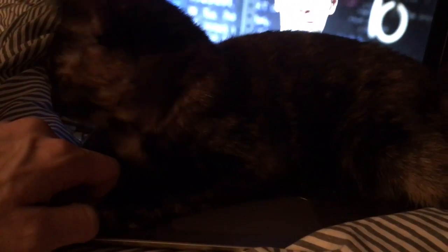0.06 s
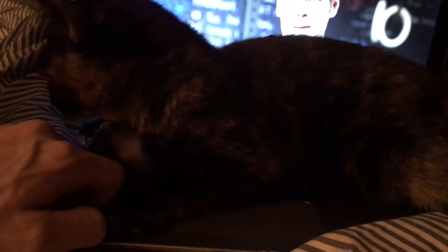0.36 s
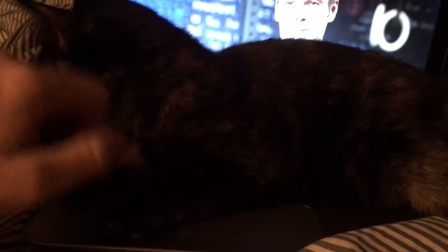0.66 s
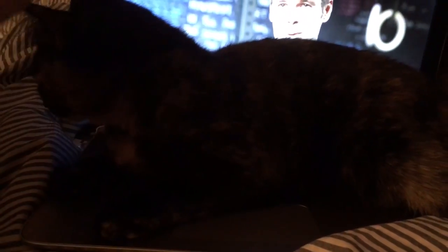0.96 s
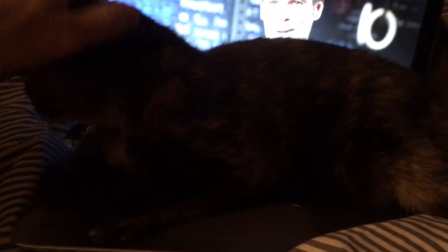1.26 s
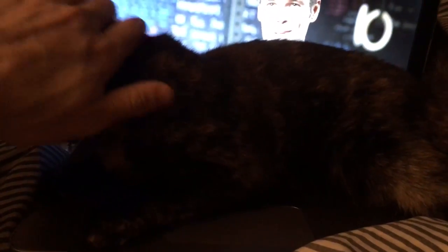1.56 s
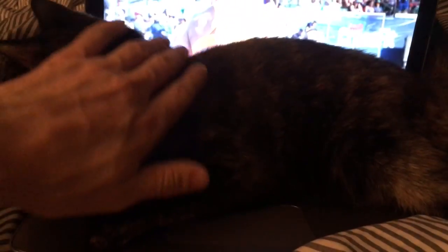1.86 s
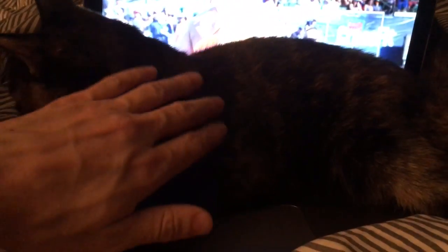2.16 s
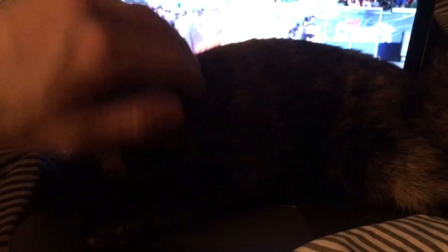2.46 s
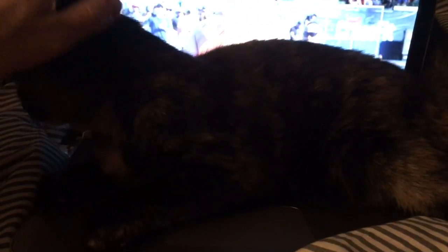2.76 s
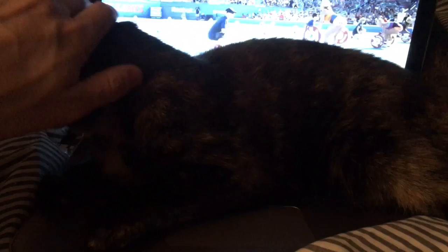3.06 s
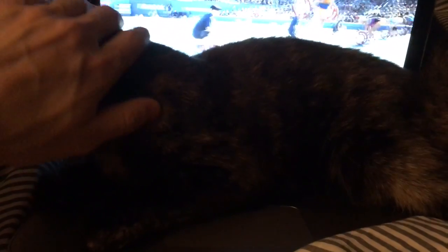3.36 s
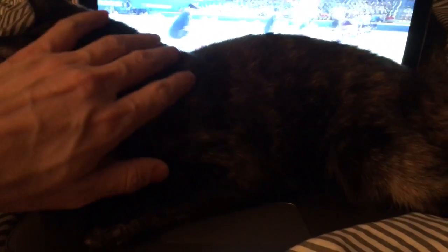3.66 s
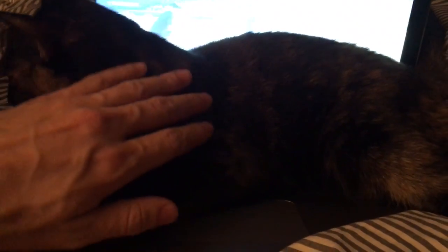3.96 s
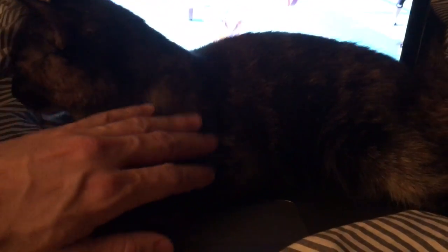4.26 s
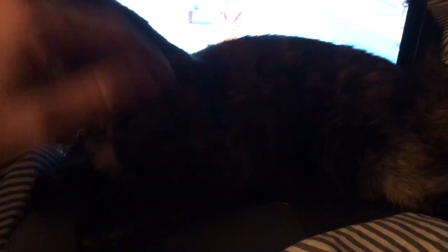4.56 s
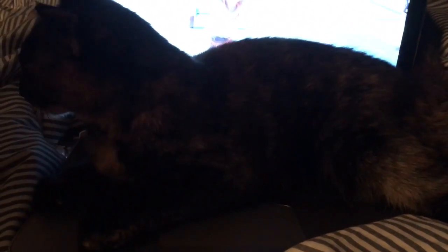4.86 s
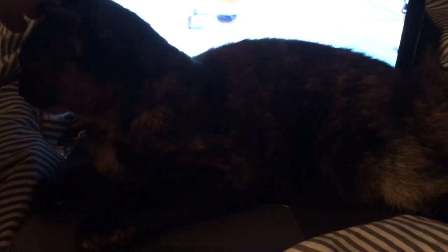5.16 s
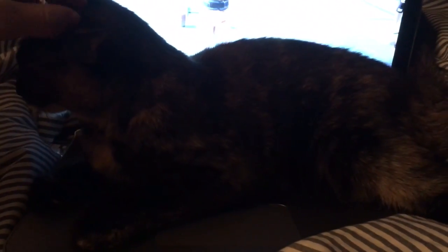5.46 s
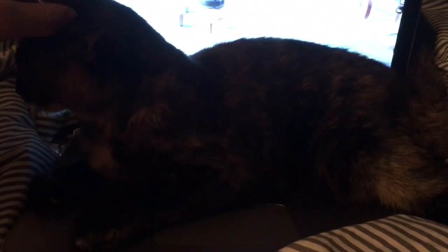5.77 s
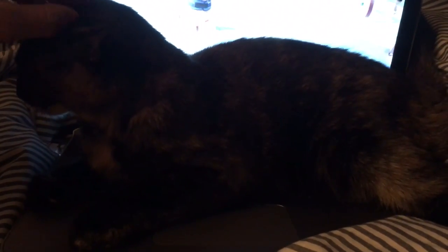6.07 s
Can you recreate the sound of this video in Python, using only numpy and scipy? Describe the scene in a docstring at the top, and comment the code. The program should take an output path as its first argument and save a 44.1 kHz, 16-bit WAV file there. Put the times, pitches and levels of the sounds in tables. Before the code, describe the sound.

In a quiet room, a cat's soft, pulsing purr comes and goes right by the microphone. The mattress gives a deep, soft bump, and a hand brushes faintly over fur, ending in tiny scratches. Meanwhile a muffled engine hum from outside grows and later drops in pitch, as a faint airy whistle briefly appears over low rumble, hiss and a thin electrical buzz.

```python
"""A cat purring on a bed

A cat purrs softly, close by: its voice box shuts and reopens, knocking its chest and ticking in its throat.
A hand strokes and scratches its fur and bumps the mattress; late on, a faint airy whistle comes and goes.
A low drone, like an engine outside, comes through the wall, sinks in pitch and climbs part of the way back.
Under it all lie room rumble, microphone hiss and a thin mains buzz."""
import sys
import numpy as np
from scipy import signal
from scipy.fft import rfft, irfft
from scipy.io import wavfile
from scipy.ndimage import uniform_filter1d

SR = 44100
rng = np.random.default_rng(int(sys.argv[2]) if len(sys.argv) > 2 else 0)


def unload_audio(sound):
    """Save the sound as a 16-bit wav file, at the path given as the first command line argument."""
    columns = np.transpose(np.atleast_2d(sound))
    # keep every value between -1 and 1, then stretch to whole-number steps
    steps = np.round(np.clip(columns, -1, 1) * 32767)
    wavfile.write(sys.argv[1], SR, steps.astype(np.int16))


N = 277814
TIME = np.arange(N) / SR
BIN_HZ = np.arange(N // 2 + 1) * SR / N  # the frequencies of a spectrum
PURR_HZ = 27.95  # beats a second


def undb(db):
    """Turn decibels into a factor to multiply by."""
    return 10 ** (np.asarray(db) / 20)


def unit(x):
    """Scale a sound to an average strength (rms) of 1."""
    return x / np.sqrt(np.mean(x ** 2))


def curve(rows, at=TIME):
    """Join (time, value) points with straight lines."""
    return np.interp(at, *np.transpose(rows))


def noise():
    """An even hiss: white noise."""
    return rng.standard_normal(N)


def wander(rate_hz):
    """A smooth random wobble with a spread near 1."""
    hold = max(int(SR / rate_hz), 2)
    steps = np.repeat(rng.standard_normal(N // hold + 1), hold)
    return unit(uniform_filter1d(uniform_filter1d(steps, hold), hold)[:N])


def swell(peak_s, rise_s, fall_s):
    """A bell-shaped curve that grows to 1 and falls away."""
    return np.exp(-.5 * ((TIME - peak_s) / np.where(TIME < peak_s, rise_s, fall_s)) ** 2)


def clicks(times, sizes):
    """Single sharp pushes at the given times."""
    out = np.zeros(N)
    np.add.at(out, np.clip((np.asarray(times) * SR).astype(int), 0, N - 1), sizes)
    return out


def resonate(x, hz, width_hz):
    """One resonance: its own pitch passes fully, others are weakened."""
    return signal.lfilter(*signal.iirpeak(hz, hz / width_hz, fs=SR), x)


def body(x, modes):
    """Ring several resonances side by side, scaled so that a push of 1 peaks at 1."""
    def ring(push):
        return sum(undb(db) * resonate(resonate(push, hz, 1.5 * width), hz, 1.5 * width)
                   for hz, width, db in modes)
    return ring(x) / np.abs(ring(signal.unit_impulse(2048))).max()


def colour(x, points):
    """Shape a sound's lows and highs along (Hz, dB) points, at strength 1."""
    hz, db = np.transpose(points)
    gain = undb(np.interp(np.log(np.maximum(BIN_HZ, 1)), np.log(hz), db))
    return unit(irfft(rfft(x) * gain, N))


def band(x, hz, width_hz):
    """Keep one band of frequencies, at strength 1."""
    return unit(irfft(rfft(x) / (1 + np.abs(2 * (BIN_HZ - hz) / width_hz) ** 3), N))


def purr(soft_db=10, snap_db=3, scatter_db=1.0, reopen_db=-5, reopen_share=.45, throat_db=-17,
         flutter_db=-2, lag_s=0.001404):
    """The voice box shuts and reopens about 28 times a second, knocking the chest, ticking the throat."""
    # strength of the purr: (time [s], relative level [dB])
    strength = [(0, -64), (0.14, -63.5), (0.3, -75), (0.45, -65), (0.75, -75), (1.2, -64.5), (1.62, -75),
                (1.88, -65.5), (2.65, -66), (3.72, -71.5), (4.08, -64), (4.45, -67), (5.0, -78), (5.2, -66),
                (5.67, -81), (6.02, -71), (6.3, -81)]
    # resonances of the chest and of the throat: (pitch [Hz], width [Hz], relative level [dB])
    chest = [(180, 91, 5.5), (251, 120, 5), (371, 109, 2.5)]
    throat = [(1110, 230, 5.5), (1600, 240, -12), (2320, 106, -6.5)]
    snap_s, peak_db, bright_db = np.transpose(snaps())  # includes the hand's two crackles
    # evenly spaced soft beats fill the gaps between the snaps
    edges = np.r_[0, snap_s, N / SR]
    beats = np.concatenate([np.linspace(start, end, max(round((end - start) * PURR_HZ), 1) + 1)[1:-1]
                            for start, end in zip(edges, edges[1:])])
    shut_late, shut_loud, reopen_late, reopen_loud = rng.standard_normal((len(beats), 4)).T
    shut_s = beats + 0.00199 * shut_late
    reopen_s = shut_s + reopen_share / PURR_HZ + 0.00297 * reopen_late
    size = undb(curve(strength, shut_s) + soft_db)
    soft = clicks(shut_s, size * undb(scatter_db * shut_loud))
    soft += clicks(reopen_s, size * undb(reopen_db + scatter_db * reopen_loud))
    knocks = soft + clicks(snap_s + lag_s, undb(peak_db + snap_db))
    ticks = soft * undb(throat_db) + clicks(snap_s + lag_s, undb(peak_db + bright_db))
    # soft tissue keeps fluttering between the beats
    flutter = unit(body(noise(), chest)) * undb(curve(strength) + flutter_db)
    sound = body(knocks, chest) + body(ticks, throat) + flutter
    # the nose passage swallows part of a band between chest and throat
    return sound - 0.39 * resonate(sound, hz=623, width_hz=590)


def snaps(fade_db=1.0, dull_db=1.2):
    """List the sharp snaps: loud purr beats, plus two bright crackles from the stroking hand."""
    # runs of snaps, each snap weaker and duller than the last; the hand's are at 2.246 and 2.269 s:
    # (start [s], snaps [count], spacing [beats], relative level [dB], brightness [dB])
    runs = [(0.057, 2, 2, -51, -26), (0.388, 1, 1, -51, -20), (0.485, 2, 1, -48, -8),
            (0.563, 1, 1, -47, -9), (0.947, 1, 1, -51, -3.5), (1.021, 1, 1, -48, -5.5),
            (1.085, 1, 1, -48.5, -9), (1.118, 4, 2, -45, -6.5), (1.839, 1, 1, -45, -9),
            (2.064, 1, 1, -49.5, -5), (2.246, 1, 1, -55, 3), (2.269, 1, 1, -51, -1.5),
            (2.498, 1, 1, -50, -7), (2.679, 3, 2, -46, -13), (3.052, 1, 1, -52.5, -5),
            (3.52, 1, 1, -49.5, -1.5), (3.842, 1, 1, -45, -20), (4.015, 3, 1, -47, -7),
            (4.351, 1, 1, -56, -0.5), (4.913, 1, 1, -47, -6.5), (5.823, 1, 1, -49, -8),
            (6.039, 1, 1, -50, -5), (6.185, 1, 1, -50, -2.5)]
    return [(start + k * round(spacing) / PURR_HZ, db - k * fade_db, bright - k * dull_db)
            for start, count, spacing, db, bright in runs for k in range(round(count))]


def drone(waver=0.0047, flicker_db=1.0, partials=5):
    """Only an engine's lowest partials (multiples of its firing rate) pass the wall into the room."""
    # speed of the engine: (time [s], firing rate [Hz])
    speed = [(0, 61.75), (0.3, 62.75), (3.3, 62.96), (3.78, 62.17), (4.03, 55.06), (4.2, 51.63),
             (4.68, 51.03), (4.95, 53.44), (5.3, 53.66), (5.8, 53.86), (6.05, 57.1), (6.3, 58.94)]
    # strength of the drone before the room shapes it: (time [s], level [dB])
    strength = [(0, -56.5), (1.22, -56.5), (1.3, -47.5), (1.85, -47.5), (2.7, -40), (3.3, -38.5),
                (4.08, -40.5), (5.45, -39.5), (5.78, -47), (6.05, -35.5), (6.3, -43)]
    # brief swells and dips of one partial: (time [s], half length [s], partial [number], change [dB])
    changes = [(3.4, 0.026, 2, -7), (3.724, 0.22, 1, 8), (3.847, 0.033, 2, -6), (3.86, 0.083, 3, -3.5),
               (4.085, 0.03, 2, 3.5), (4.175, 0.018, 2, -14), (4.717, 0.036, 2, -9.5),
               (5.055, 0.053, 2, -12), (5.12, 0.18, 3, -5), (5.917, 0.042, 2, -16)]
    hz, level_db = curve(speed), curve(strength)
    phase = 2 * np.pi * np.cumsum(hz * (1 + waver * wander(20))) / SR
    out = np.zeros(N)
    for k in range(1, partials + 1):
        change_db = sum(db * swell(s, half, half) for s, half, number, db in changes if round(number) == k)
        gain = undb(level_db + change_db + flicker_db * wander(25)) * room_gain(k * hz)
        out += gain * np.sin(k * phase + rng.uniform(0, 2 * np.pi))
    return np.sqrt(2) * out


def room_gain(hz):
    """The room carries a tone more strongly when it is near one of the room's resonances."""
    # resonances of the room: (pitch [Hz], width [Hz], gain [dB])
    modes = [(59, 6.2, -20.5), (107.9, 7.85, -1.5), (123.97, 11.7, -5), (150.4, 10.7, -6),
             (176.3, 12.85, -15.5), (192.4, 14, -20), (250, 20, -31.5)]
    return sum(undb(db) / (1 + (2 * (hz - centre) / width) ** 2) for centre, width, db in modes)


def rumble_and_hiss(rumble_db=-55.5, hiss_db=-73, sway_db=0.16, creep_db=1, creep_s=0.8):
    """The room rumbles and the microphone hisses; both start a little quiet and creep up."""
    # tone colour of the rumble and of the hiss: (frequency [Hz], relative level [dB])
    rumble_shape = [(20, -20.5), (35, -2.5), (55, -4), (85, 2.5), (130, 2.5), (190, -5), (260, -9),
                    (400, -18), (650, -28), (780, -25.5), (860, -20), (1100, -24), (1500, -33.5),
                    (3000, -47)]
    hiss_shape = [(500, -11), (1500, 9), (2450, 6.5), (2800, 1), (3200, 3.5), (4400, 0.5), (4950, -2.5),
                  (6100, 2), (7600, -3.5), (9800, 0), (10450, -6), (11200, -2), (13500, -3.5), (17000, -7)]
    rumble = colour(noise(), rumble_shape) * undb(rumble_db + sway_db * wander(5))
    hiss = colour(noise(), hiss_shape) * undb(hiss_db)
    creep = undb(-creep_db * np.exp(-TIME / creep_s))
    return creep * (rumble + hiss)


def mains_buzz(mains_hz=59.99, level_db=-82.5, first_s=.0101, scatter_db=1.5, jitter_s=.00005):
    """One tiny electric spike in every cycle of the mains power makes a thin buzz."""
    # tone colour of the buzz: (frequency [Hz], relative level [dB])
    buzz_shape = [(2000, -47), (4800, -6.5), (6200, 6.5), (7700, -4), (8600, -0.5), (9700, -1), (10500, -2),
                  (12000, 0.5), (17000, -8)]
    times = np.arange(first_s, N / SR, 1 / mains_hz)
    late, loud = rng.standard_normal((len(times), 2)).T
    spikes = clicks(times + jitter_s * late, undb(scatter_db * loud))
    return colour(spikes, buzz_shape) * undb(level_db)


def mattress(hz=42.2, width_hz=5.2):
    """Each push sets the mattress swaying at its low resonance, which then dies away."""
    # pushes on the mattress: (start [s], length [s], peak level [dB])
    pushes = [(0.073, 0.018, -51), (0.561, 0.061, -44), (0.765, 0.049, -35), (0.902, 0.059, -48.5),
              (0.991, 0.047, -50.5), (2.002, 0.04, -56)]
    out = np.zeros(N)
    for start, length, db in pushes:
        age = np.maximum(TIME - start, 0)
        rise = np.sin(np.pi / 2 * np.minimum(age / length, 1))
        fade = np.exp(-np.pi * width_hz * np.maximum(age - length, 0))
        out += undb(db) * rise * fade * np.sin(2 * np.pi * hz * age)
    return out


def strokes(grain_db=2.5, scratch_s=0.035):
    """Hairs slip under the hand in a grainy rustle as it strokes and scratches."""
    # strokes on fur and bedding: (peak time [s], rise [s], fall [s], level [dB], centre [Hz], width [Hz])
    sweeps = [(0.79, 0.067, 0.085, -70.5, 7460, 9600), (1.15, 0.096, 0.074, -71, 595, 300),
              (1.45, 0.17, 0.17, -77, 3250, 3400), (1.68, 0.08, 0.05, -75, 5600, 1750),
              (1.69, 0.07, 0.05, -69.5, 2650, 1800), (1.83, 0.05, 0.075, -70, 2130, 1500),
              (1.84, 0.097, 0.092, -71, 980, 400), (2.225, 0.033, 0.03, -64.5, 920, 850),
              (2.23, 0.04, 0.016, -72.5, 2300, 1800), (2.55, 0.052, 0.095, -73, 1250, 1400),
              (3.22, 0.028, 0.03, -78, 3280, 1800), (4.042, 0.019, 0.013, -63, 2430, 1900),
              (4.02, 0.13, 0.14, -72, 1140, 1090), (4.32, 0.064, 0.037, -69.5, 970, 447),
              (4.75, 0.039, 0.098, -79, 4476, 8020)]
    # fingertips scratching the head: (time [s], level [dB])
    scratches = [(5.54, -80), (5.65, -81), (5.75, -79), (5.88, -79), (6.05, -76.5), (6.201, -78)]
    friction = noise() * undb(grain_db * wander(500))
    out = np.zeros(N)
    for s, rise, fall, db, hz, width_hz in sweeps:
        shifted = np.roll(friction, rng.integers(N))  # each stroke gets its own grain
        out += undb(db) * swell(s, rise, fall) * band(shifted, hz, width_hz)
    scratching = sum(undb(db) * swell(s, scratch_s, scratch_s) for s, db in scratches)
    return out + scratching * band(friction, hz=6500, width_hz=6500)


def hair_ticks(gain_db=-5, fade_s=0.0052):
    """Hair and cloth let go with tiny ticks, each a quickly fading burst of bright noise."""
    # ticks of hair and cloth: (time [s], relative level [dB])
    ticks = [(0.955, -53), (1.4363, -57), (5.3273, -55.5), (5.8717, -60), (6.1875, -59)]
    times, db = np.transpose(ticks)
    releases = clicks(times, undb(db + gain_db)) + 1e-18
    fades = signal.lfilter([1], [1, -np.exp(-1 / (fade_s * SR))], releases)
    return resonate(fades * noise(), hz=5000, width_hz=7000)


def whistle(hz=2140, width_hz=360, flicker_db=3.0):
    """A faint, narrow band of noise comes and goes as an airy tone in broken wisps."""
    # strength of the whistle: (time [s], level [dB])
    strength = [(3.9, -100), (4.15, -77.5), (4.87, -78.5), (5.05, -83.5), (5.6, -100)]
    return band(noise(), hz, width_hz) * undb(curve(strength) + flicker_db * wander(55))


def scene():
    """Cat, hand and bed close by, the drone and background behind them, in one channel."""
    sound = purr() + drone() + mattress() + strokes() + hair_ticks() + whistle()
    return (sound + rumble_and_hiss() + mains_buzz())[None]


def record(dry, top_hz=17100):
    """The recorder cuts off the very highest treble."""
    return signal.sosfilt(signal.ellip(10, .2, 70, top_hz, fs=SR, output="sos"), dry)


dry = scene()
out = record(dry)
unload_audio(out)
```